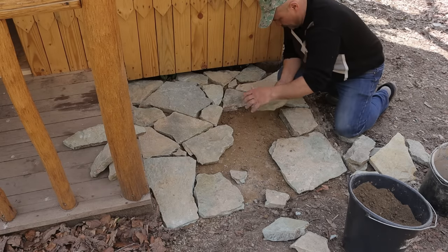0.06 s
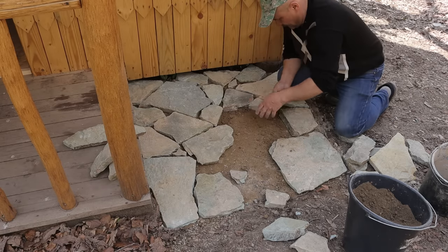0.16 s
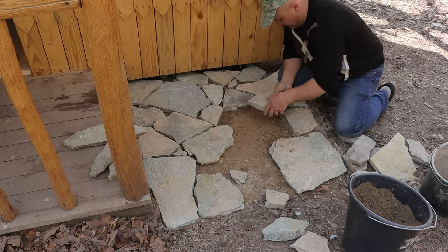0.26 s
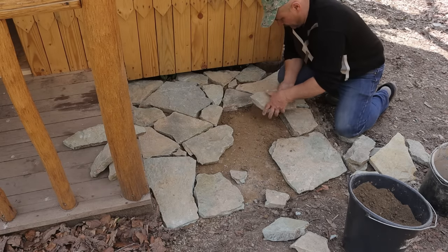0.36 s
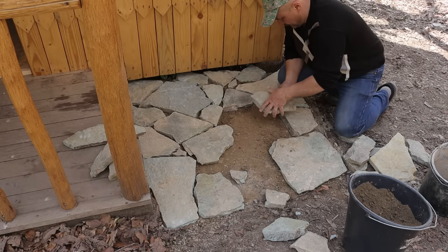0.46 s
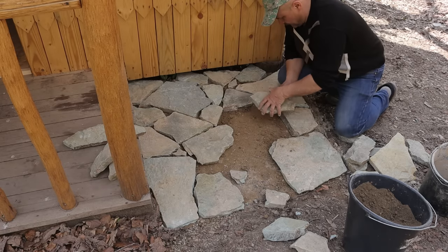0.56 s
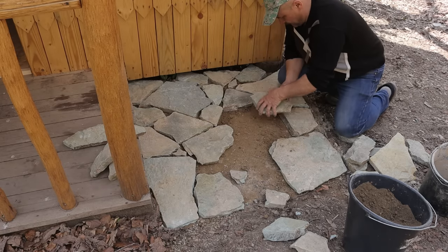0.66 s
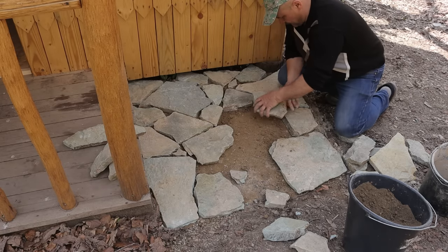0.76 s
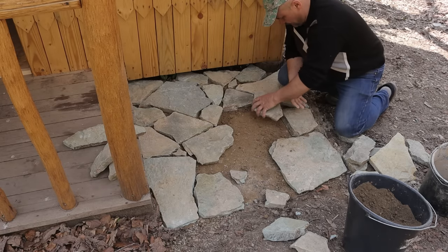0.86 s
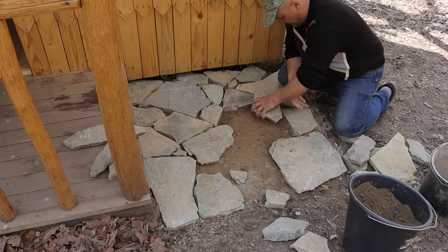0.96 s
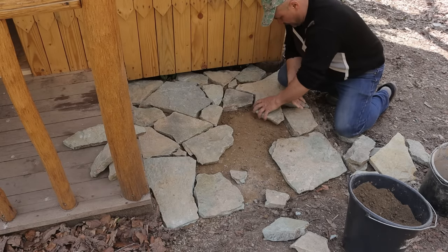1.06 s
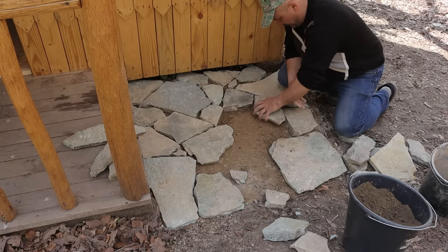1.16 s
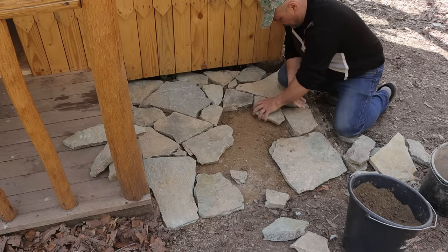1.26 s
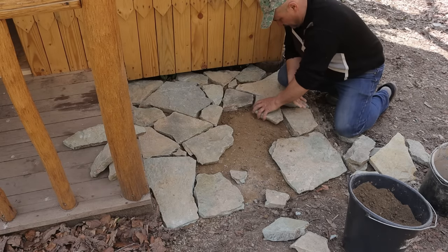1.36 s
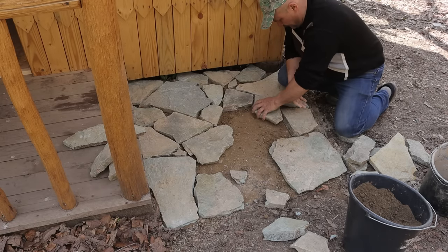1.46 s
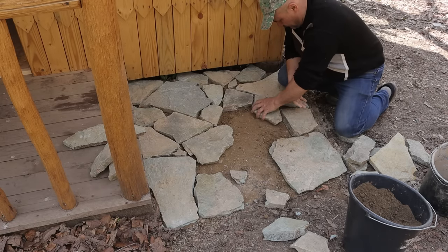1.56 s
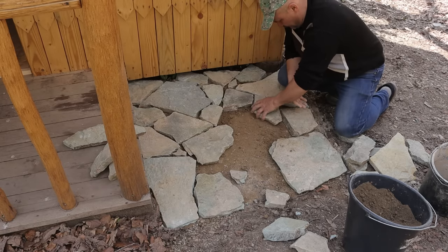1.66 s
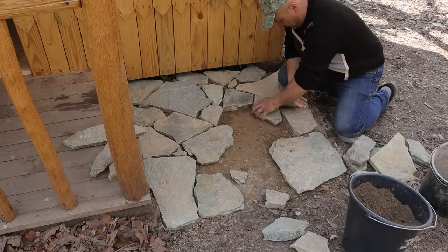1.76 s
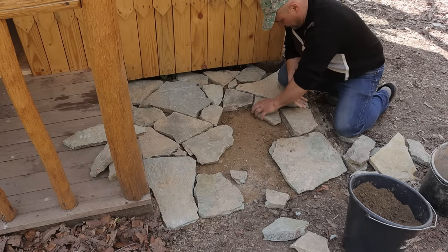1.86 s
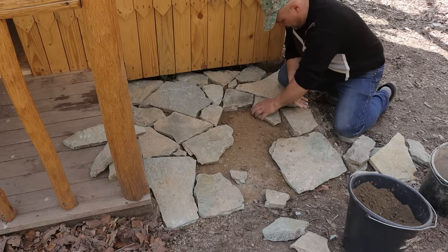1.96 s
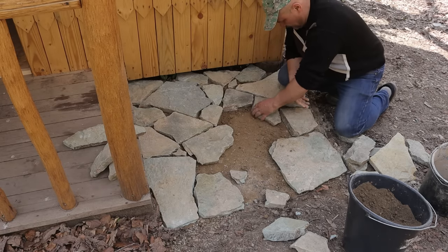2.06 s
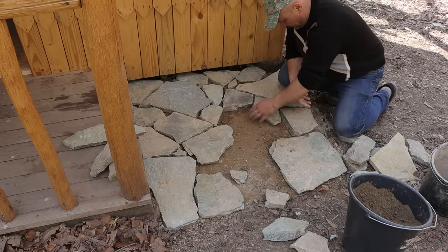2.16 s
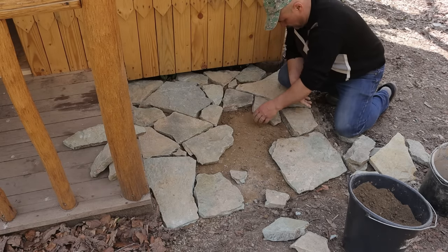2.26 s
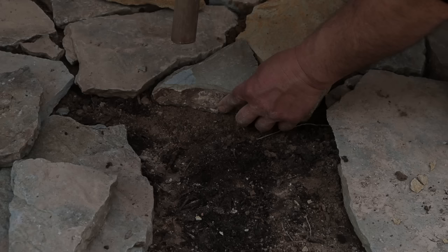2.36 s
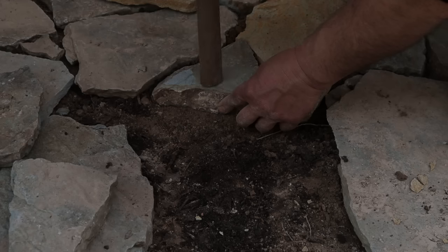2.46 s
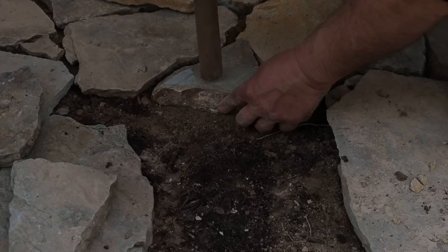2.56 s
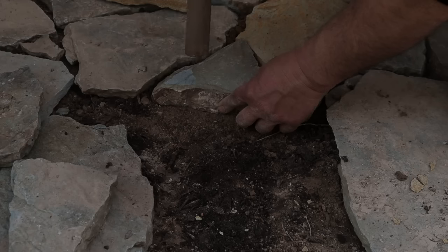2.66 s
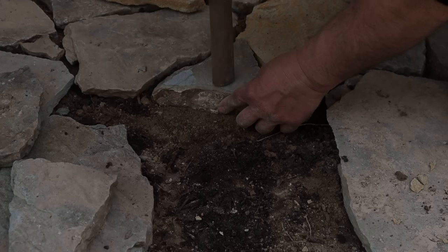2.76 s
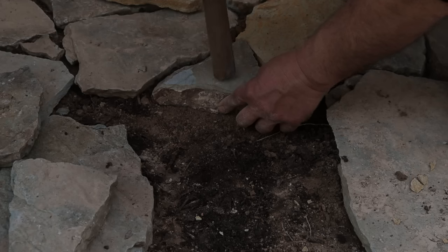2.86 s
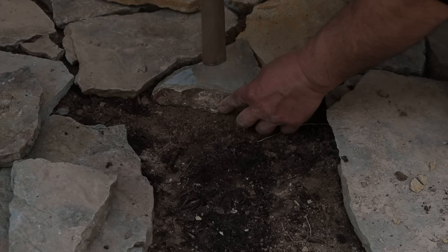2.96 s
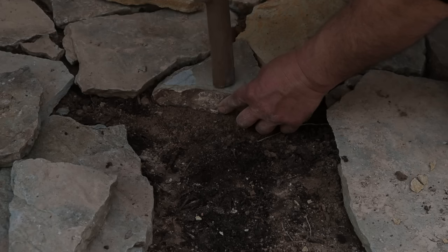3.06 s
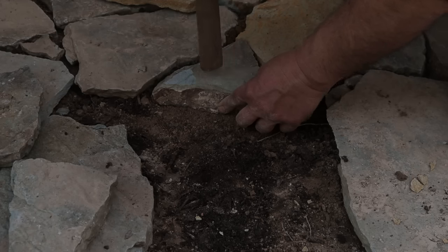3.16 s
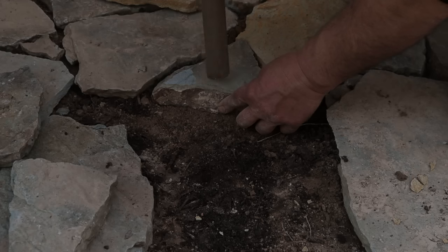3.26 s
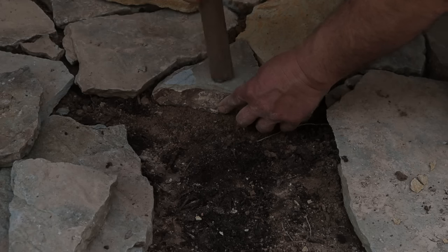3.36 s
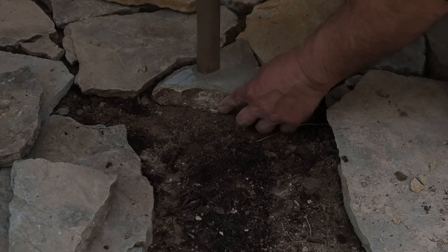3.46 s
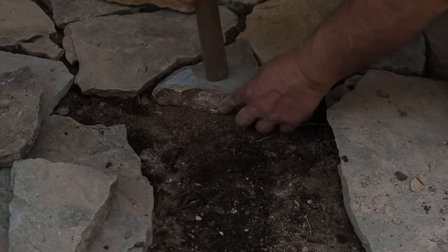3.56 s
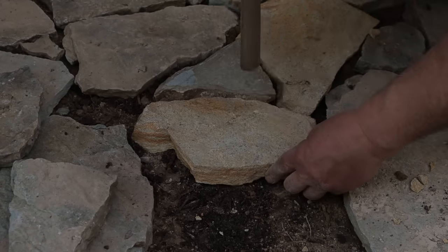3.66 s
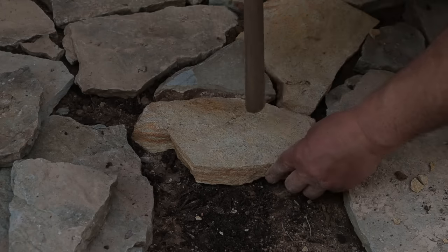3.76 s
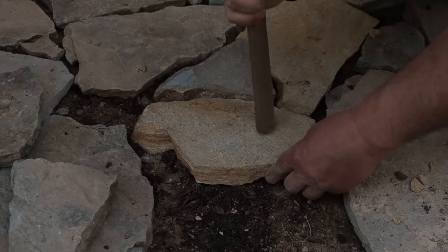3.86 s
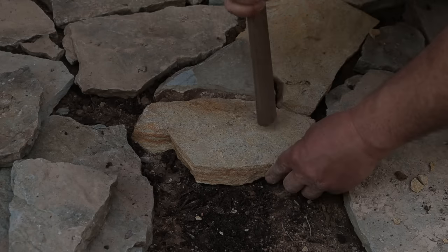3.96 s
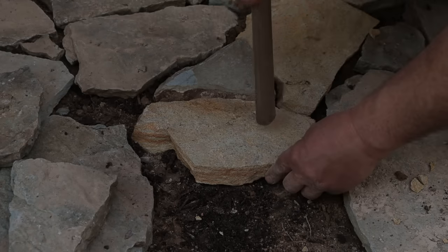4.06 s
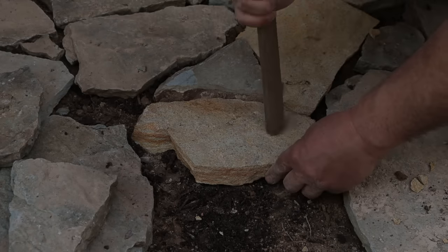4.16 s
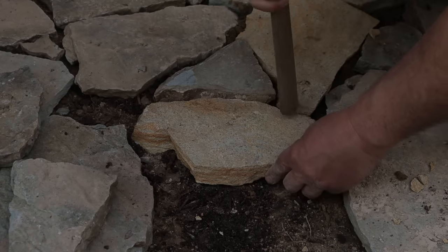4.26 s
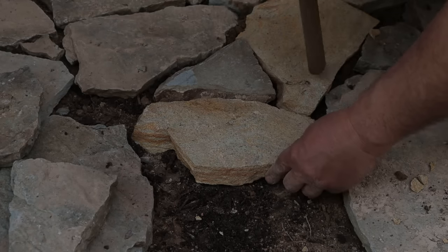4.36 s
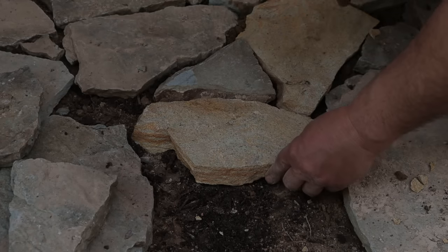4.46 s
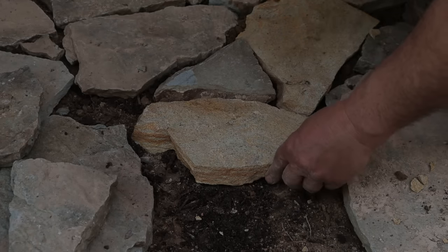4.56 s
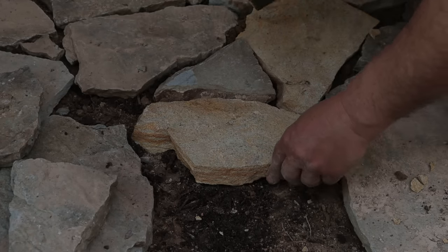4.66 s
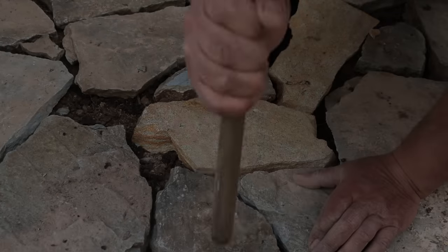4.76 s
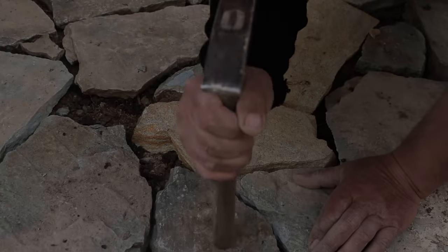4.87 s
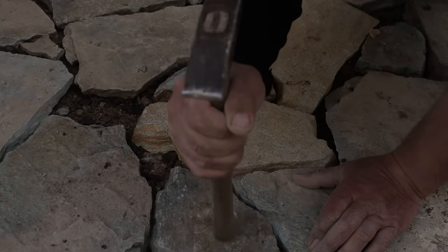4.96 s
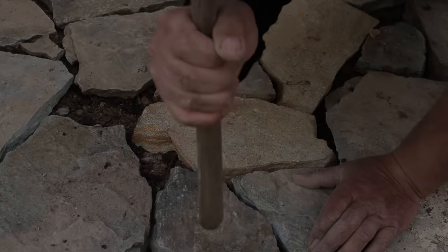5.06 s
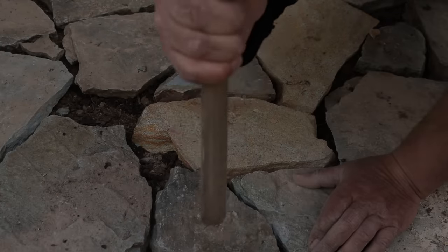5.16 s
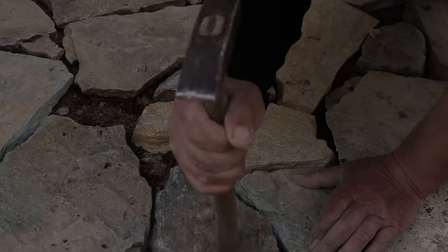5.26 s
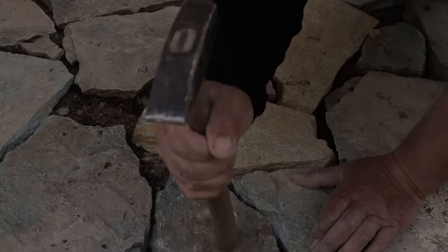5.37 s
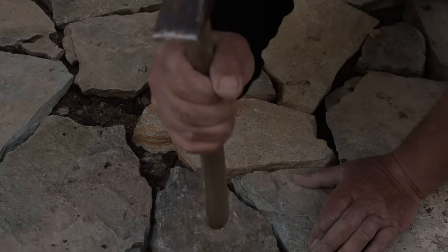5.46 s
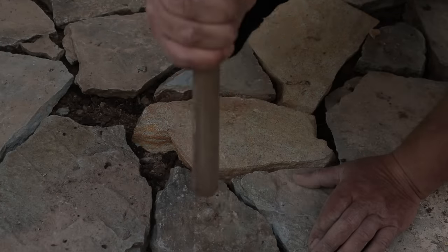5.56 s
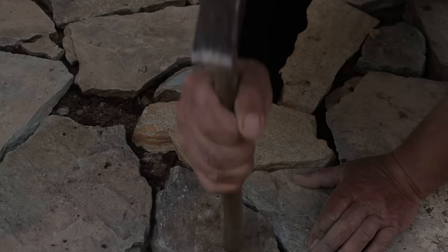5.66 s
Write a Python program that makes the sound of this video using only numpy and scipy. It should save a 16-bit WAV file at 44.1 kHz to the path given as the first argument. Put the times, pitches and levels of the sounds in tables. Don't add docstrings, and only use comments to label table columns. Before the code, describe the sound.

A quiet back yard with faint air hiss. Until about 1.1 s there is only soft brushing of hands on stone, with a tiny far bird whistle at 0.8 s. From 1.2 to 2.0 s a loose flat slab clacks and clinks on its neighbours, loudest near 1.6 s, with gritty slides and a dull low drop at 1.96 s. At 2.4 s the scene cuts to close tamping: five very loud, gritty wooden-handle knocks on stone at 2.5, 2.85, 3.1, 3.4 and 3.6 s. A second slab gets two cleaner, more hollow knocks at 3.9 and 4.2 s. A third gets two weighty blows at 4.9 and 5.3 s, with ground thump and a faint steel ring. Each blow overloads slightly, slaps off porch and fence, then echoes diffusely from the yard. Small grit ticks follow; low wind buffets the microphone from 4.7 s, with faint bird chips near 4.7 and 5.6 s.

```python
import sys
import numpy as np
from scipy import signal
from scipy.fft import irfft
from scipy.io import wavfile
from scipy.ndimage import uniform_filter1d, minimum_filter1d

SR = 44100
rng = np.random.default_rng(int(sys.argv[2]) if len(sys.argv) > 2 else 0)


def natural_amplitude(level_db):
    exponent = np.asarray(level_db, float) / 20
    return 10 ** exponent


def inscribe(sig):
    pcm = np.round(np.clip(np.atleast_2d(sig).T, -1, 1) * 32767)
    wavfile.write(sys.argv[1], SR, pcm.astype(np.int16))


N = 251811

TAKE_EDGES = [0, 2.402, 3.70, 4.722, 6]
# start_s, strength_db, brightness_db_per_octave, grit_db, steel_db
BLOWS = [
    [(2.528, 7.5, 2, -3, -45), (2.849, 8, -0.5, -9.5, -45), (3.126, 6, -2, -9.5, -45.5),
     (3.374, 6.5, -1, -5.5, -41.5), (3.59, 4.5, -0.5, -6.5, -44.5)],
    [(3.918, 5, -0.8, -29.5, -50.5), (4.2, 5, -0.8, -23, -52.5)],
    [(4.8973, 7, 0.2, -9, -38.5), (5.335, 6.5, -0.76, -7, -47)],
]
# start_s, yard_db
EARLIER_BLOWS = [
    (2.25, -4),
    (3.559, 0),
    (4.56, -8),
]
# pitch_hz, width_hz, level_db
SLABS = [
    [(176, 49, 4.5), (360, 50, -15.5), (602, 58, 1), (893, 170, 5), (1154, 264, 6.5), (1343, 59, -10),
     (1697, 150, 0.5), (1950, 260, -12), (2450, 60, -3.5), (2976, 260, 1), (4703, 140, -2),
     (5820, 100, -21.5), (6100, 140, -23.5), (7100, 140, -18.5)],
    [(366.6, 120, -19.5), (726, 26, -7), (960, 280, 11.5), (1393, 190, 0), (1898, 350, -4), (2830, 170, -7),
     (3290, 170, -5.5), (3740, 190, -26.5), (4830, 480, -29), (4910, 240, -21)],
    [(650, 37, -16), (801, 66, 3.5), (1390, 120, -0.5), (1638, 120, -0.5), (2022, 47, -4.5),
     (2490, 130, -27), (3400, 170, -11), (3650, 600, -8), (4960, 420, -11.5), (4667, 83, -27),
     (6230, 240, -13), (7220, 300, -35)],
]
SLAB_EDGES = [269, 550, 430]
SOIL_DB = [-1, -7, 2.5]
# pitch_hz, level_db, t60_s
GROUND = [(86.8, -40, 0.29), (60, -46.5, 0.19), (108, -51.5, .1), (165, -39, 0.013)]
# pitch_hz, level_below_first_db, t60_s
STEEL_SECOND = (7000, -20.5, 0.043)
# delay_s, level_db
WALLS = [(.0040, -8.5), (.0062, -23), (.0095, -26.5), (0.0126, -20.5), (0.0143, -16)]
# band_hz, t60_s
PORCH = [(100, 0.08), (900, 0.17), (3000, 0.14), (8000, 0.094), (15000, 0.024)]
# band_hz, t60_s
YARD = [(100, 0.29), (900, 0.64), (3000, 0.74), (6000, 0.41), (10000, 0.055)]
YARD_DB = [-1.5, -4.5, -2]
# fade_start_s,
# fade_end_s
EARLY_S = (0.076, 0.11)
# lift_before_db_per_s, last_echo_s, drop_db, lift_after_db_per_s
TREES = [(0, 0.33, -1.5, 27.5), (10, .165, -9.5, 64.5), (25.2, 0.23, -2.5, 33)]
# band_hz, level_db_per_hz
ECHOES = [
    [(88, -33.5), (150, 5), (324, -17), (398, -4.5), (818, -8), (1050, -13), (1370, -5.5), (1750, -13.5),
     (5500, -23), (8000, -27.5), (11700, -68)],
    [(90, -50), (150, -0.5), (500, -12.5), (830, -3), (950, 3), (1080, -7.5), (1400, -19.5), (2050, -21),
     (3000, -29), (4300, -43.5), (9000, -36.5), (12000, -68.5)],
    [(88, -44), (150, -1), (324, -18), (601, -14.5), (751, -6), (1340, -7), (2330, -23.5), (3330, -17),
     (4100, -23.5), (9000, -31.5), (11700, -54.5)],
]
# start_s, level_db, dull_body_hz, main_ring_db
CLACKS = [(1.2102, -18.5, 577, -34.5), (1.247, -50, 530, -11), (1.299, -24, 990, -26.5),
          (1.316, -65, 340, -22), (1.504, -22, 534, -46), (1.5762, -9.5, 1200, -21),
          (1.6293, -11.5, 826, -35), (1.931, -27, 1040, -20), (1.957, -25, 760, -39)]
# pitch_hz, t60_s
SLAB_RING = (2503, 0.15)
# pitch_hz, level_db, t60_s
LOOSE_NOTES = [(2070, 4.5, 0.03), (3655, -14.5, 0.019), (4300, -15, 0.15), (5502, -6, 0.028),
               (7570, -4, 0.022)]
# start_s, pitch_hz, level_db
CHIMES = [(1.2105, 2070, -44), (1.247, 2070, -53), (1.3, 5502, -53), (1.504, 2070, -43.5),
          (1.5759, 3655, -40.5), (1.577, 5502, -44.5), (1.612, 3655, -49), (1.6282, 4300, -55),
          (1.931, 3655, -38), (1.957, 2070, -31), (1.958, 4300, -42)]
# start_s, level_db
THUMPS = [
    (1.198, -54),
    (1.254, -42),
    (1.314, -30),
    (1.601, -28.5),
    (1.958, -16.5),
]
# peak_s, level_db, rise_s, fall_s
SCRAPES = [(1.25, -51, 0.017, .04), (1.3, -34.5, .0012, 0.015), (1.485, -51.5, 0.14, .05),
           (1.515, -38, 0.013, 0.011), (1.57, -51, .035, .003), (1.635, -42, 0.0028, 0.03),
           (1.68, -54, .05, 0.18), (1.9, -55.5, .07, 0.026), (1.92, -31, 0.019, 0.041),
           (1.955, -48, 0.031, 0.045), (2.04, -61, 0.019, 0.11)]
# start_s, level_db, pitch_hz, t60_s
PEBBLES = [(0.017, -60, 2450, 0.097), (.302, -60, 1800, 0.035), (3.7215, -44.5, 2890, 0.012),
           (3.72, -51, 5470, 0.014), (4.0358, -47.5, 2940, 0.032), (4.292, -48.5, 3000, .025),
           (4.839, -45, 2300, 0.0065), (5.4625, -48, 9400, 0.0037), (5.502, -54, 6000, 0.0035),
           (5.666, -54, 3000, 0.012)]
# start_s, length_s, from_hz, to_hz, level_db
BIRDS = [
    (0.781, 0.11, 2676, 3870, -60),
    (3.74, .15, 2540, 2480, -60),
    (4.62, 0.037, 3400, 3420, -60.5),
    (4.748, 0.056, 4590, 4490, -61.5),
    (5.633, 0.018, 6500, 4610, -57.5),
    (5.65, 0.044, 4650, 4320, -62.5),
]
# peak_s, level_db, rise_s, fall_s
RUBS = [(.02, -51, 0.034, 0.064), (.428, -55.5, 0.18, 0.1), (.476, -51, 0.024, 0.13),
        (.585, -55, 0.029, 0.1), (.706, -63.5, .035, 0.15), (.812, -59, 0.11, .03),
        (1.87, -55.5, 0.17, 0.06), (1.925, -63, .02, .06), (1.96, -45.5, .04, 0.011),
        (2.04, -51.5, 0.037, .06), (4.635, -58.5, 0.19, .3)]
# band_hz, level_db_per_hz
RUB_COLOUR = [(400, -27.5), (900, -17), (1800, -1.5), (4000, -2), (7000, -2), (9500, 1), (13000, -1),
              (16000, -8.5)]
# band_hz, level_db_per_hz
AIR = [(35, -22), (60, -7), (213, -6.5), (275, -9), (317, -9.5), (507, -9), (1210, -14), (1760, -16.5),
       (2020, -16.5), (12600, -24.5), (16300, -24.5)]
WIND_DB = [
    -63.5,
    -53.5,
    -59.5,
    -47,
]
# peak_s, level_db, rise_s, fall_s
GUSTS = [(1.4, -57.5, 0.7, 2.8), (4.76, -49, 0.046, 0.37), (5.1, -44, 0.2, 0.087), (5.5, -48.5, 0.31, 0.48)]
# band_hz, level_db_per_hz
WIND_COLOUR = [(15, -2.5), (40, 8.5), (95, -5.5), (135, -16.5), (200, -28.5), (400, -44.0), (1000, -62.0)]

DELAY_S = .002
BEDDING_HZ = 60
GROUND_RISE_S = .004
STEEL_HZ, STEEL_T60 = 8492, 0.082
PORCH_DB, EARLY_DB, AIR_DB = -23, 5, -57
YARD_PER_BRIGHT = .8
YARD_START_S, YARD_SWELL_S = .018, 0.01
TREE_EDGE_S = .008
STROKE_DB = 20
BUFFET_DB, BUFFET_S = 3.0, 0.12


def tamping():
    out = np.zeros(N)
    t = np.arange(N) / SR
    for k, rows in enumerate(BLOWS):
        direct, yard = np.zeros(N), np.zeros(N)
        for s, db, bright_db, grit_db, steel_db in rows:
            hit = blow(SLABS[k], SLAB_EDGES[k], SOIL_DB[k], bright_db, grit_db, steel_db)
            add(direct, s + DELAY_S, natural_amplitude(db + 10.0) * hit)
        echoed = [EARLIER_BLOWS[k]] + [(row[0], YARD_PER_BRIGHT * row[2]) for row in rows]
        for s, hard_db in echoed:
            add(yard, s, natural_amplitude(YARD_DB[k] + hard_db) * yard_echo(ECHOES[k], *TREES[k]))
        in_take = (t > TAKE_EDGES[k + 1]) * (t < TAKE_EDGES[k + 2])
        out += (near(direct) + yard) * in_take
    return out


def blow(slab, edge_hz, soil_db, bright_db, grit_db, steel_db):
    hz, width, db = np.transpose(slab)
    shift, share = rng.standard_normal((len(slab), 2)).T * [[.012], [1]]
    damped_width = width + BEDDING_HZ
    height_db = db + 20 * np.log10(damped_width) + share + bright_db * np.log2(hz / 1000)
    body = -ring(zip(hz * (1 + shift), height_db, 2.45 / damped_width), .4)
    body = signal.lfilter(*signal.butter(2, edge_hz, "high", fs=SR), body)
    body /= abs(body).max()

    t = np.arange(len(body)) / SR
    grit = natural_amplitude(grit_db - 60 * t / 0.0086) * rng.standard_normal(len(t))
    grit = signal.lfilter(*signal.butter(2, 6000, fs=SR), grit)
    tick = natural_amplitude(grit_db - 8.5 - 60 * t / 0.0012) * rng.standard_normal(len(t))
    contact = (body + tick + grit) * (1 - np.exp(-t / 0.0003))

    second_hz, second_db, second_t60 = STEEL_SECOND
    steel = ring([(STEEL_HZ, steel_db, STEEL_T60), (second_hz, steel_db + second_db, second_t60)], .4)
    ground = ring([(f * (1 + 3 * d), db, t60) for (f, db, t60), d in zip(GROUND, shift)], .4)
    ground = natural_amplitude(soil_db) * ground * (1 - np.exp(-t / GROUND_RISE_S))
    return contact + steel - ground


def near(x):
    walls = np.zeros(1200)
    for s, db in WALLS:
        size = round(.18 * s * SR)
        scatter = rng.standard_normal(200)[:size] * np.hanning(size)
        add(walls, s, natural_amplitude(db) * scatter / np.linalg.norm(scatter))
    walls = signal.lfilter(*signal.butter(1, 2500, fs=SR), walls)
    first_echoes = signal.oaconvolve(x, walls)[:N]
    porch = signal.oaconvolve(x, tail(PORCH, 0.0056))[:N]
    return x + first_echoes + natural_amplitude(PORCH_DB) * porch


def yard_echo(colour, early_db_s, trees_s, drop_db, late_db_s):
    spectrum = natural_amplitude(read(colour, np.fft.rfftfreq(2048, 1 / SR)))
    shape = np.roll(irfft(spectrum), 1024)
    echo = signal.oaconvolve(tail(YARD, YARD_START_S), shape)[1024:]
    t = np.arange(len(echo)) / SR
    lift_db = early_db_s * np.minimum(t, trees_s) + late_db_s * np.clip(t - trees_s, 0, .2)
    lift_db = lift_db + drop_db * np.clip((t - trees_s) / TREE_EDGE_S, 0, 1)
    lift_db = lift_db + np.interp(t, EARLY_S, [EARLY_DB, 0])
    swell = np.clip((t - YARD_START_S) / YARD_SWELL_S, 0, 1)
    return echo / np.linalg.norm(echo) * natural_amplitude(lift_db) * swell


def loose_stone():
    out = np.zeros(N)
    t = np.arange(round(.3 * SR)) / SR
    damped = natural_amplitude(-700 * np.clip(t - .045, 0, .03))
    touch = 1 - np.exp(-(t / 0.00086) ** 2)
    ring_hz, ring_t60 = SLAB_RING

    for s, hz, db in CHIMES:
        notes = ring([(hz, db + 2.5, .05), (1.04 * hz, db + 3.5, .02)], .3)
        add(out, s + DELAY_S / 2, notes * damped * touch)
    for s, db, body_hz, main_db in CLACKS:
        chime = ring([(ring_hz, main_db, ring_t60)], .3) * damped
        dull = ring([(body_hz, 0, .012), (1.44 * body_hz, -3, .01),
                     (0.647 * body_hz, -4, .016), (2400, -10, .006)], .3)
        crack = natural_amplitude(-38 - 60 * t / 0.054) * rng.standard_normal(len(t))
        add(out, s + DELAY_S / 2, natural_amplitude(db + 4.5) * (chime + dull + crack) * touch)
    for s, db in THUMPS:
        add(out, s, -ring([(100, db, 0.025), (62, db - 16.5, 0.28)], .3))

    caught = rng.exponential(1, N), rng.choice([-1, 1], N), rng.random(N) < 5000 / SR
    grains = natural_amplitude(3.5 * caught[0]) * caught[1] * caught[2]
    notes = [(hz, db - 6, .3 * t60) for hz, db, t60 in LOOSE_NOTES] + [(ring_hz, -5, .012)]
    dull_notes = [(1070, -2, 0.0094), (575, -5.5, 0.0095), (1400, -6.5, 0.0061), (5900, -23.0, 0.012)]
    slab = ring(notes + dull_notes, .1)
    slide = evened(signal.oaconvolve(grains, slab)[:N]) * strokes(SCRAPES)
    return near(out + slide)


def pebbles():
    out = np.zeros(N)
    t = np.arange(round(.06 * SR)) / SR
    for s, db, hz, t60 in PEBBLES:
        tick = natural_amplitude(db + 2 - 60 * t / 0.0095) * rng.standard_normal(len(t))
        notes = ring([(hz, db + 10, t60), (1.2 * hz, db + 6.0, .7 * t60), (0.51 * hz, db - 5, 1.1 * t60)], .06)
        add(out, s, (notes + tick) * signal.windows.tukey(len(t), .03))
    return out


def birds():
    out = np.zeros(N)
    for s, length, from_hz, to_hz, db in BIRDS:
        hz = np.linspace(from_hz, to_hz, round(length * SR))
        waver = evened(uniform_filter1d(rng.standard_normal((8000, 2)), size=250, axis=0))
        pitch_waver, level_waver = waver[:len(hz)].T
        phase = 2 * np.pi * np.cumsum(hz * (1 + .004 * pitch_waver)) / SR
        note = np.sin(phase) * natural_amplitude(db + 3.0 * level_waver)
        add(out, s, note * signal.windows.tukey(len(hz), .4))
    return out + 0.45 * signal.oaconvolve(out, tail(PORCH, 0.0052))[:N]


def background():
    air = natural_amplitude(AIR_DB) * noise(AIR, patchy_db=.4)
    rub = noise(RUB_COLOUR, patchy_db=1.5) * strokes(RUBS) * natural_amplitude(0.5)
    wind = noise(WIND_COLOUR, patchy_db=2.0)
    buffet = evened(uniform_filter1d(rng.standard_normal(N), round(BUFFET_S * SR)))
    take = np.searchsorted(TAKE_EDGES, np.arange(N) / SR, "right") - 1
    steady = natural_amplitude(np.array(WIND_DB))[take]
    wind = wind * natural_amplitude(BUFFET_DB * buffet) * (steady + strokes(GUSTS))
    return air + rub + wind


def strokes(rows):
    t = np.arange(N) / SR
    gain = np.zeros(N)
    for s, db, rise, fall in rows:
        away = np.where(t < s, (s - t) / abs(rise), (t - s) / abs(fall))
        gain += natural_amplitude(db - STROKE_DB * away.clip(0, 10))
    return gain


def ring(modes, seconds):
    t = np.arange(round(seconds * SR)) / SR
    return sum(natural_amplitude(db - 60 * t / t60) * np.sin(2 * np.pi * hz * t) for hz, db, t60 in modes)


def noise(colour, patchy_db):
    hz = np.fft.rfftfreq(1024, 1 / SR)
    a, b, patches = rng.standard_normal((N // 256 + 5, 513, 3)).T
    patches = uniform_filter1d(patches, size=14, axis=0)
    patches = evened(uniform_filter1d(patches, size=10, axis=1))
    z = (a + 1j * b) * natural_amplitude(read(colour, hz)[:, None] + patchy_db * patches)
    return evened(signal.istft(z, nperseg=1024, noverlap=768)[1][:N])


def tail(decays, start):
    taps = np.zeros(SR)
    at = np.arange(round(start * SR), SR - 20, 20)
    taps[at + rng.integers(0, 20, len(at))] = rng.choice([-1., 1.], len(at))
    hz, t, z = signal.stft(taps, SR, nperseg=128)
    fade = natural_amplitude(-60 * t / read(decays, hz)[:, None])
    out = signal.istft(z * fade, SR, nperseg=128)[1]
    return out / np.linalg.norm(out)


def read(points, hz):
    f, value = np.transpose(points)
    return np.interp(np.log(hz + 1), np.log(f + 1), value)


def evened(x):
    return x / np.sqrt(np.mean(x ** 2) + 1e-20)


def add(mix, s, sound):
    part = mix[round(s * SR):][:len(sound)]
    part += sound[:len(part)]


def scene():
    return (tamping() + loose_stone() + pebbles() + birds() + background())[None]


def top_cut(x):
    return signal.sosfilt(signal.butter(12, 15850, fs=SR, output="sos"), x)


def record(dry):
    power_db = 10 * np.log10(signal.lfilter([.01], [1, -.99], dry[0] ** 2) + 1e-12)
    over_db = np.clip(power_db + 17.0, 0, 9)
    held = -minimum_filter1d(-over_db, size=2601, origin=1300)
    recovery = np.arange(N) * 170.0 / SR
    duck_db = np.maximum.accumulate(held + recovery) - recovery
    quick = np.exp(-1 / (0.0061 * SR))
    ducked = dry / natural_amplitude(signal.lfilter([1 - quick], [1, -quick], duck_db))
    ducked = signal.lfilter(*signal.butter(1, 35, "high", fs=SR), ducked)
    finished = np.clip(ducked, -1, 1)
    return top_cut(finished)


dry = scene()
out = record(dry)
inscribe(out)
```